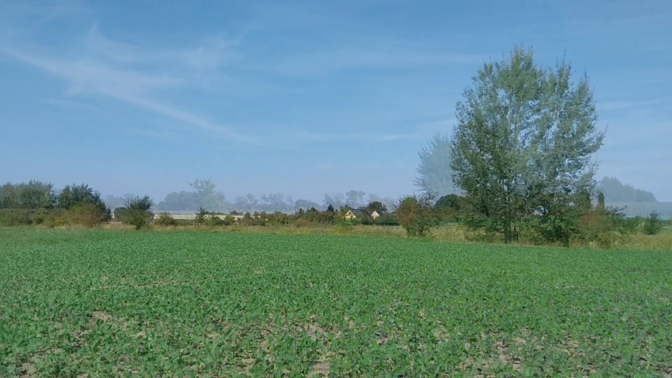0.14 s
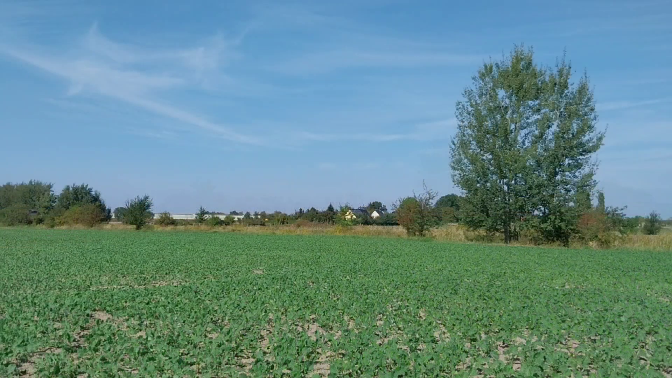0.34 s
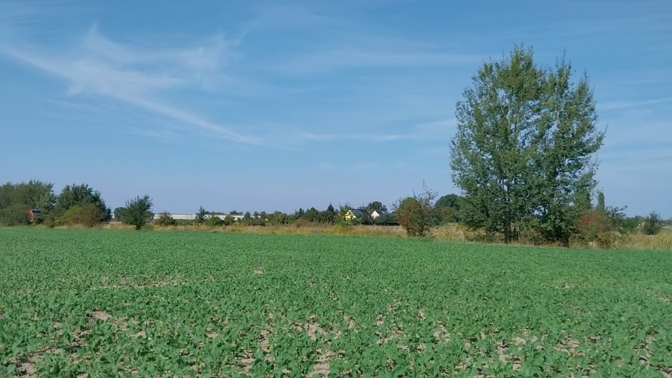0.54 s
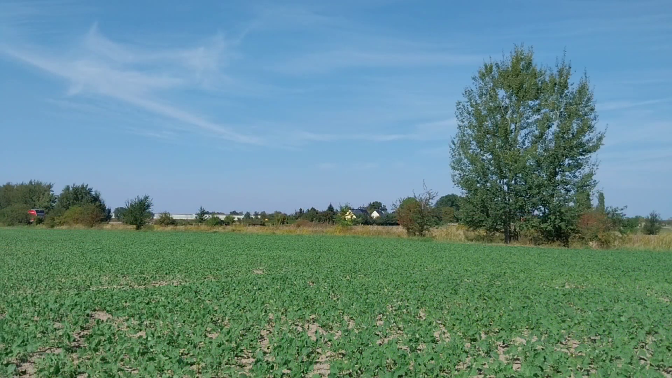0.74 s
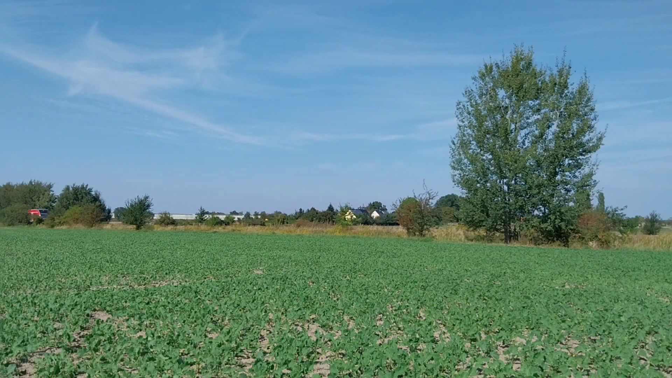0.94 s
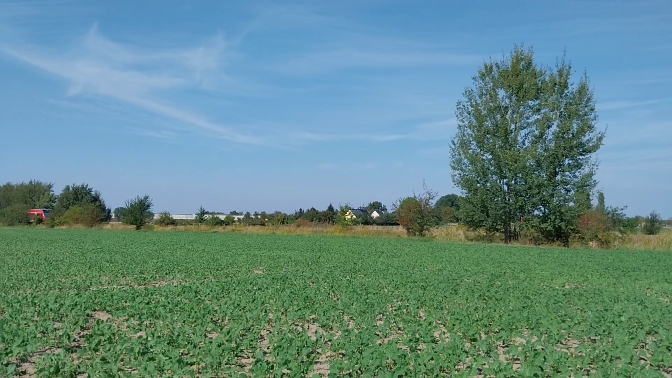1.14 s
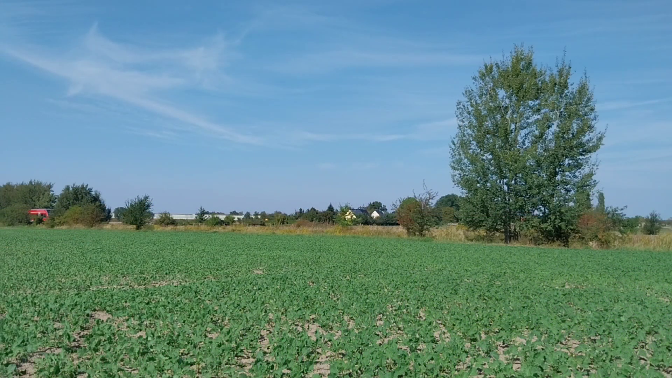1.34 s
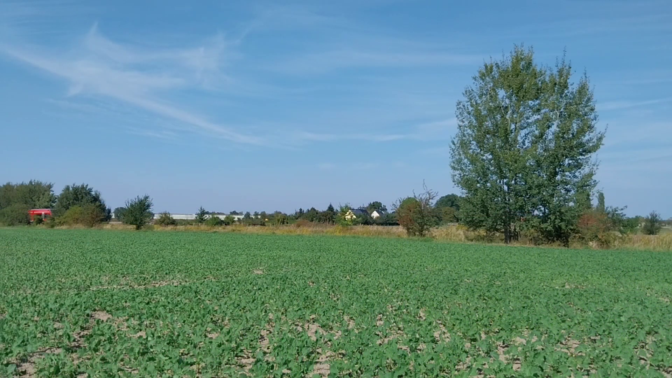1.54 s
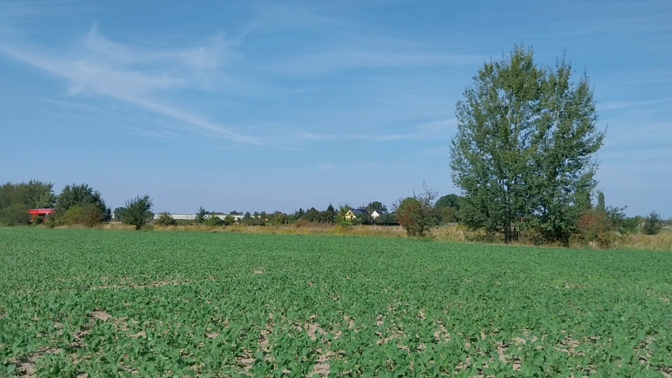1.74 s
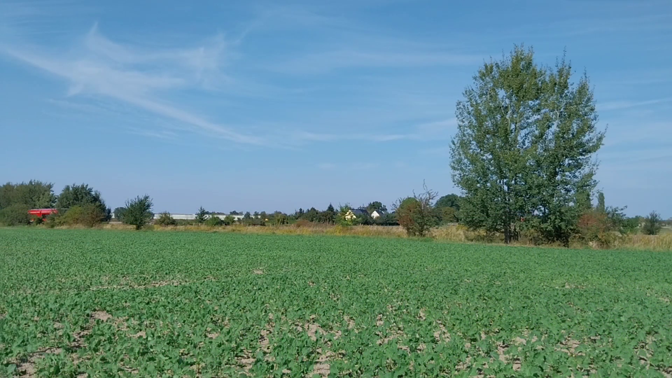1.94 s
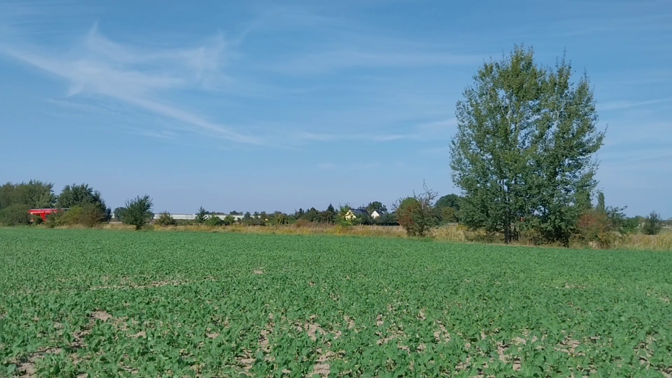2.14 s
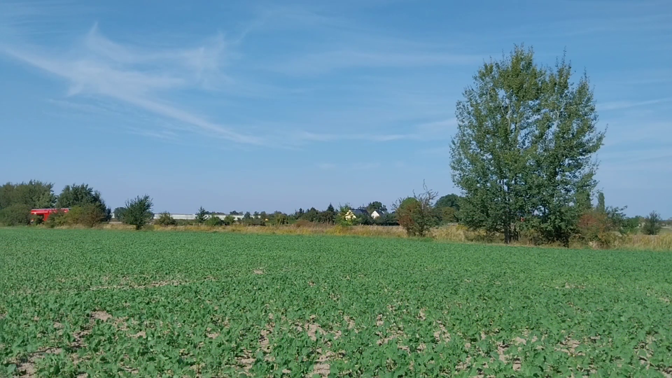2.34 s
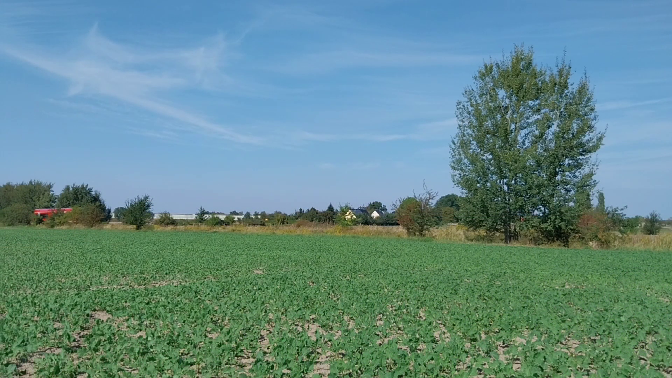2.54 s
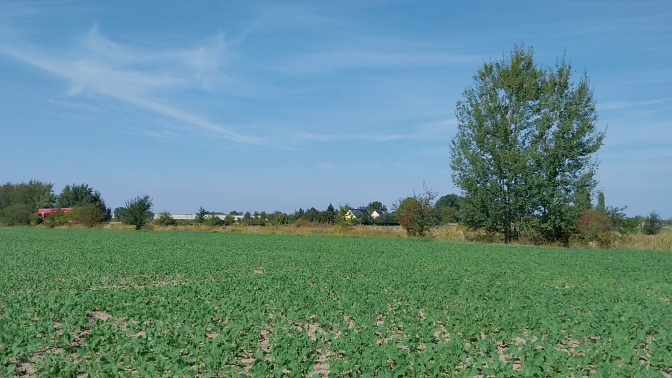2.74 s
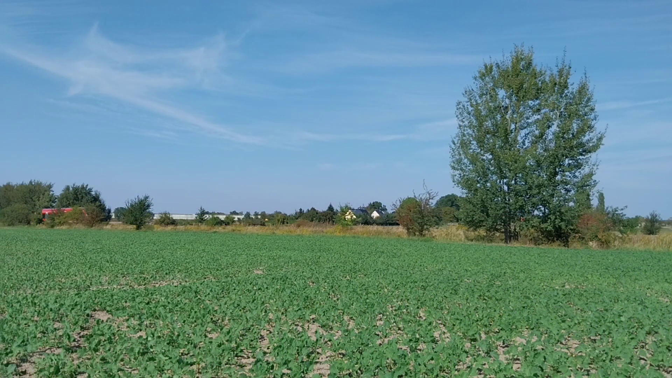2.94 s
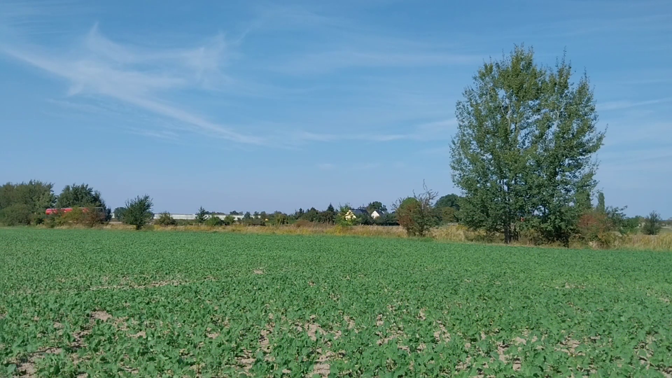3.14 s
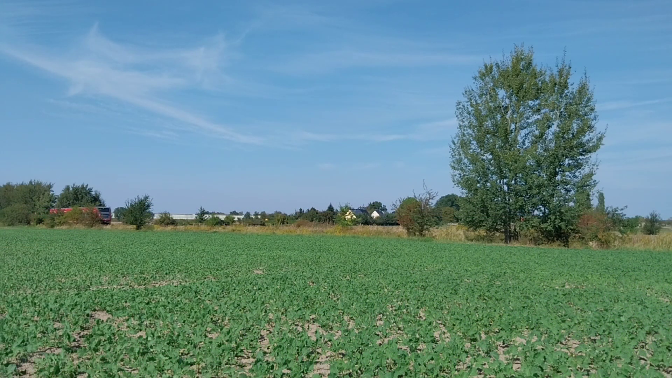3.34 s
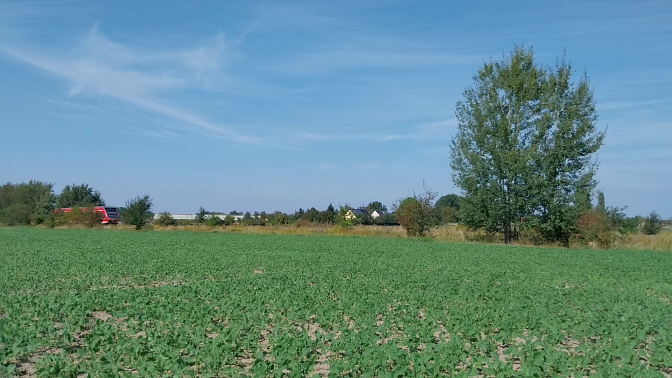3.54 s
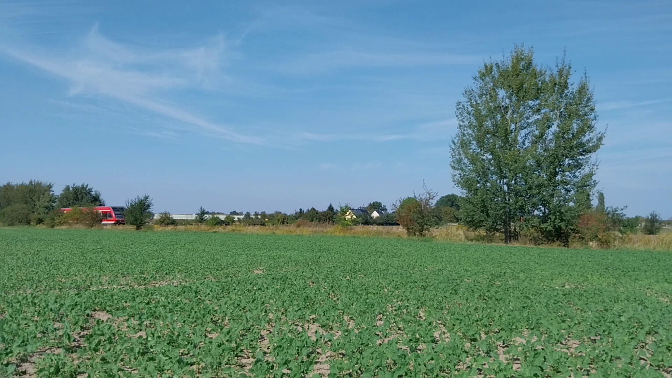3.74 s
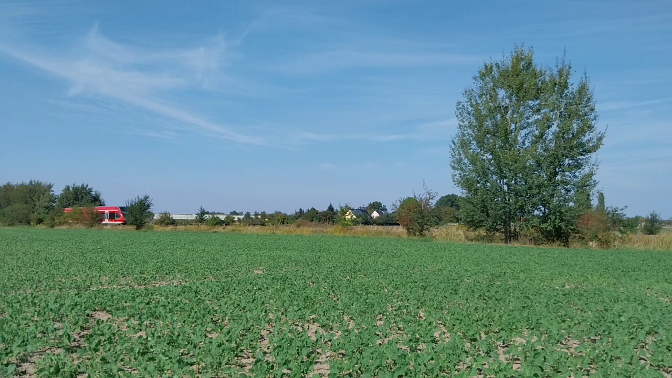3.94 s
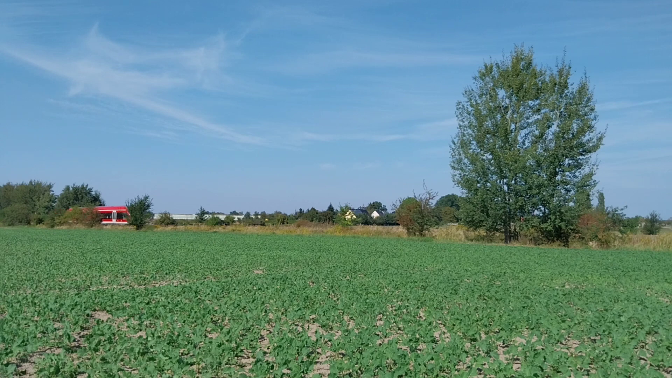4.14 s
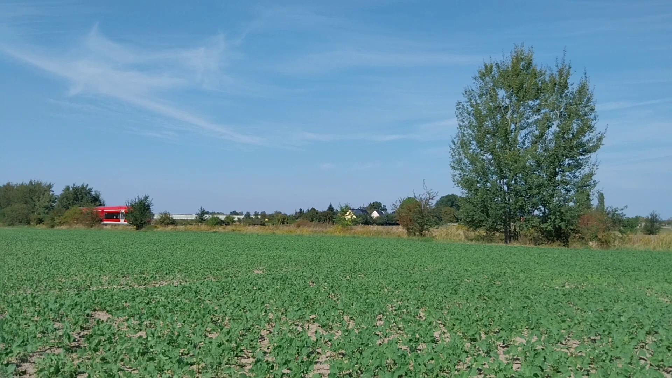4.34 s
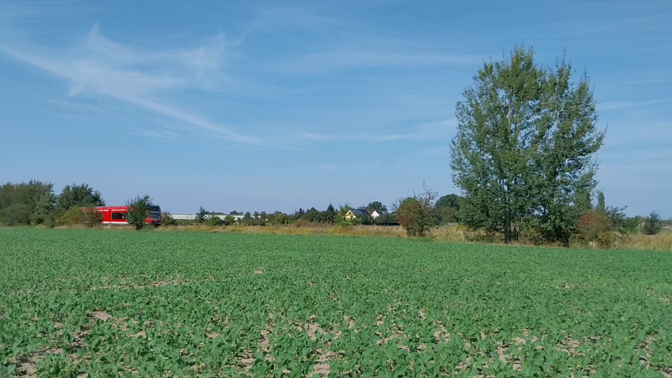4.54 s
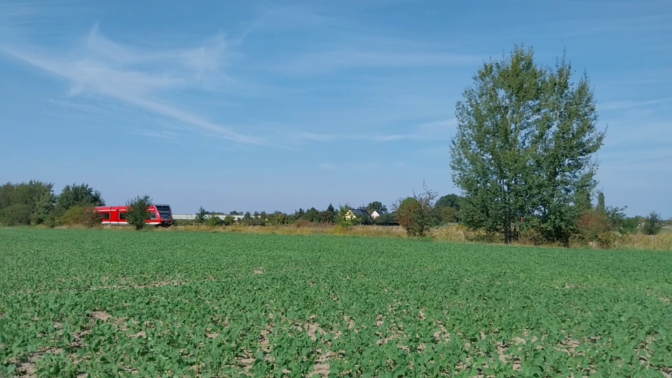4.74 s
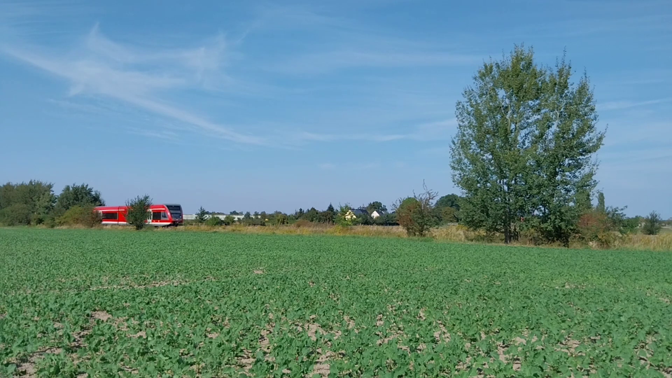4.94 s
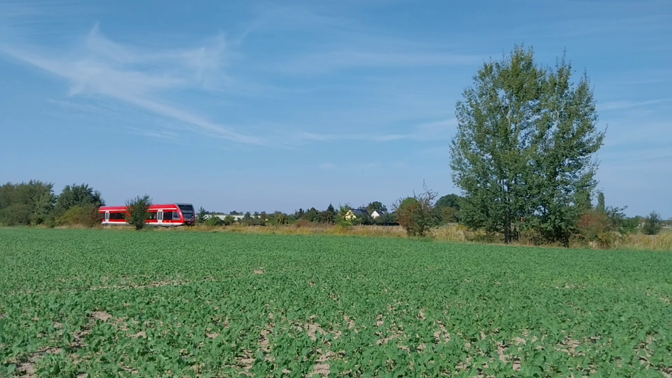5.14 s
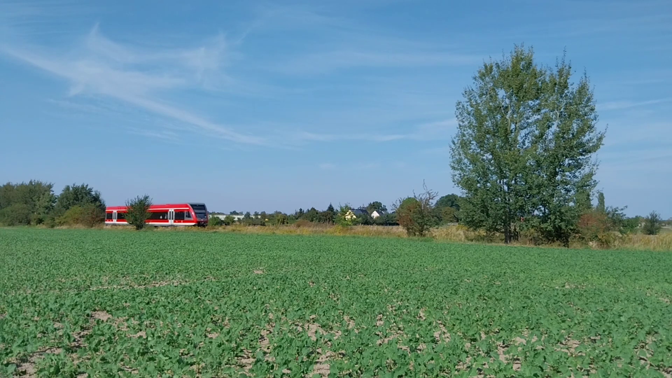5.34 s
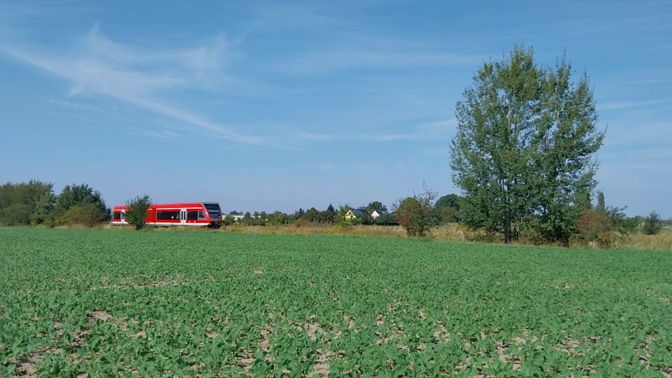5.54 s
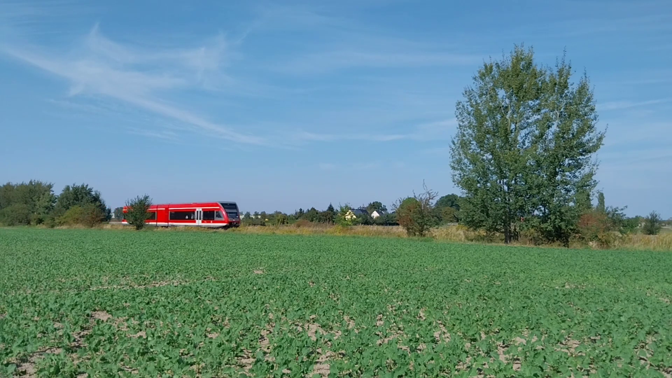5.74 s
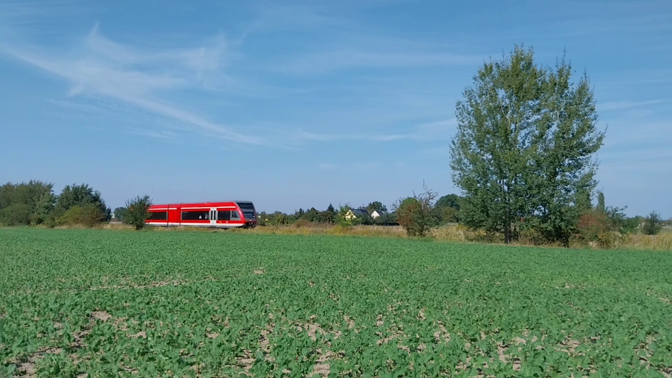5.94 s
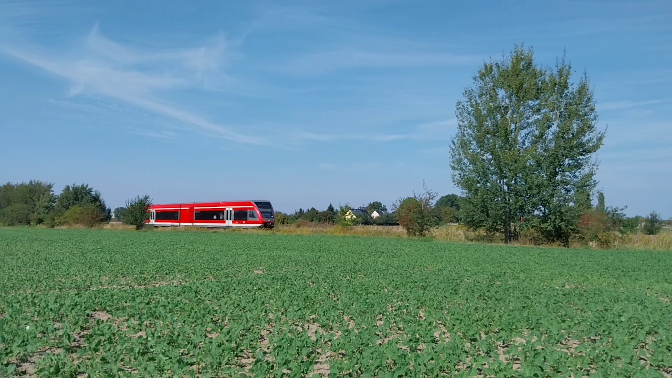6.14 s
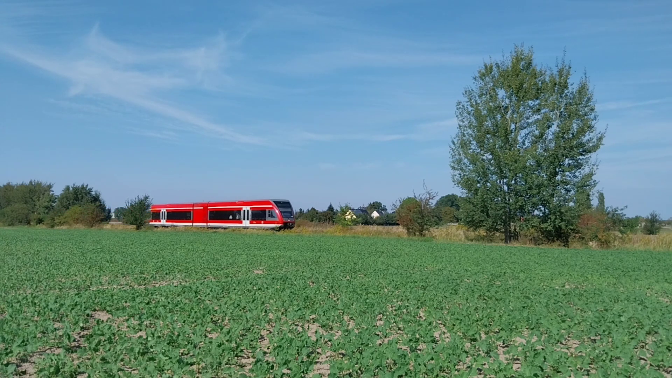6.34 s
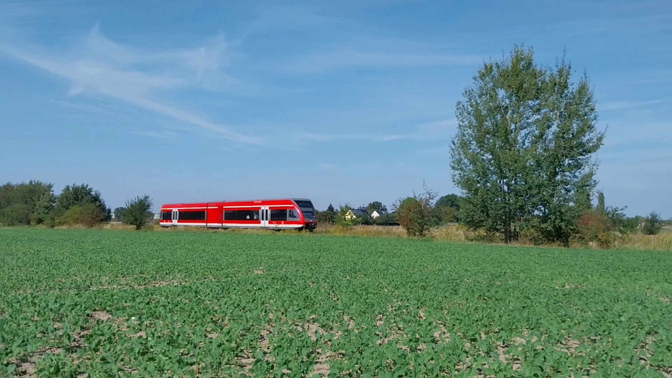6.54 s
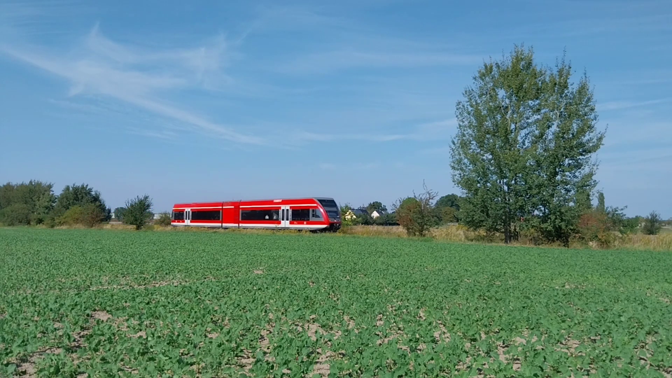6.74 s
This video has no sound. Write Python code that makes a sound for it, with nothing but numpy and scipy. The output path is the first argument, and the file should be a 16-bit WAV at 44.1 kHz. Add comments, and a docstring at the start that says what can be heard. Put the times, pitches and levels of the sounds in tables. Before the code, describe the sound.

A soft rustle fades away within the first half second over very faint hiss. A diesel railcar approaches across open countryside, its smooth low drone swelling with rumble and wheel roar. Near five seconds the engine eases off and its pitch slides down while the rolling noise keeps growing. From about 5.6 seconds a reflex camera just right of the stereo microphone fires a fast burst of crisp mechanical clacks until the end.

```python
"""A soft rustle is faded out over the first 0.6 s, over faint microphone hiss: both are shaped noise.
Meanwhile a diesel railcar nears across open fields: shaped noise for rumble, wheel roar and rail hiss, which grow,
and sines locked to the crankshaft for its engine, which drones, then slows as the driver eases off.
Near the end a reflex camera just right of the microphone fires a burst: damped modes and noise per stroke."""
import sys
import numpy as np
from scipy import signal
from scipy.fft import rfft, irfft
from scipy.io import wavfile
from scipy.ndimage import uniform_filter1d

SR = 44100
rng = np.random.default_rng(int(sys.argv[2]) if len(sys.argv) > 2 else 0)


def dump(signal):
    """Clip the signal to [-1, 1] and save it as 16-bit WAV at the path in sys.argv[1]."""
    limited = np.clip(np.atleast_2d(signal).T, -1, 1)
    pcm = np.round(limited * 32767).astype(np.int16)
    wavfile.write(sys.argv[1], SR, pcm)


N = 298998
TIME = np.arange(N) / SR
FRAME_S = np.arange(N // 512 + 6) * 512 / SR
BIN_HZ = np.fft.rfftfreq(2048, 1 / SR)


def gain_of(db):
    """Decibels to gain."""
    return 10 ** (np.asarray(db) / 20)


def evened(x):
    """Scales to rms 1."""
    return x / np.sqrt(np.mean(x ** 2) + 1e-20)


def read(points, hz):
    """Interpolates a table of (Hz, value) over log frequency."""
    table_hz, value = np.transpose(points)
    return np.interp(np.log(hz + 1), np.log(table_hz), value)


def curve(rows, t):
    """Interpolates a table of (s, value) at the times t."""
    return np.interp(t, *np.transpose(rows))


def ramp(t, start_s, length_s):
    """Rises from 0 to 1 over length_s, then holds."""
    return np.clip((t - start_s) / length_s, 0, 1)


def add(mix, start_s, sound):
    """Mixes a stereo sound in at start_s, cut at the end of the mix."""
    part = mix[:, round(start_s * SR):][:, :sound.shape[1]]
    part += sound[:, :part.shape[1]]


def wander(limit_hz):
    """Slow noise of about rms 1, reaching up to about limit_hz."""
    size = 2 ** 19
    hz = np.fft.rfftfreq(size, 1 / SR)
    spectrum = rfft(rng.standard_normal(size)) / (1 + (hz / limit_hz) ** 4)
    return evened(irfft(spectrum)[:N])


# straight track; the nearest point comes after the end of the scene
SPEED_M_PER_S, TRACK_M, NEAREST_S = 21.2, 70.0, 7.63
PORT_LEAD_MS = .26  # lead of the left microphone for a sound from the far left


def train_place(t):
    """The train's distance (m) and the lead of the left microphone (s) that its bearing gives."""
    to_go_m = SPEED_M_PER_S * (NEAREST_S - t)
    distance_m = np.hypot(to_go_m, TRACK_M)
    return distance_m, PORT_LEAD_MS / 1000 * to_go_m / distance_m


def approach(nearest_db, loss_db):
    """Gain of a sound that loses loss_db with each doubling of the train's distance."""
    return gain_of(nearest_db - loss_db * np.log2(train_place(TIME)[0] / TRACK_M))


# Level difference of the microphones. Each row: frequency in Hz, left minus right in dB.
MIC_BALANCE = [(55, -1.3), (68, -3), (76, -5.4), (83, -5.4), (90, -1.1), (170, -.7), (230, -2.6), (320, 1),
               (420, -1), (560, -5.5), (850, -1.2), (4400, -.5), (15000, -1)]
# Phase difference of the microphones. Each row: frequency in Hz, lead of the left in radians.
MIC_PHASE = [(78, -0.18), (88, 0.36), (115, 0.45), (200, -0.04), (280, 0.33), (430, -0.34), (570, 0.41),
             (1200, 0.037)]


def air_noise(field_db, patchy_db, likeness):
    """Stereo noise from the train's side with a given spectrum, mottled by moving air; rms 1."""
    a, b, c, d, patches = rng.standard_normal((5, len(FRAME_S), len(BIN_HZ)))
    patches = uniform_filter1d(patches, size=12, axis=0)
    patches = evened(uniform_filter1d(patches, size=14, axis=1))
    lead_s = train_place(FRAME_S)[1][:, None]
    delay = np.exp(-2j * np.pi * BIN_HZ * lead_s - 1j * read(MIC_PHASE, BIN_HZ))
    left = a + 1j * b
    right = delay * (likeness * left + np.sqrt(1 - likeness ** 2) * (c + 1j * d))
    lean = gain_of(read(MIC_BALANCE, BIN_HZ) / 2)
    field = np.array([left * lean, right / lean]) * gain_of(field_db + patchy_db * patches)
    noise = signal.istft(field.transpose(0, 2, 1), nperseg=2048, noverlap=1536)[1]
    return evened(noise[:, :N])


# Likeness of the two channels for the train and the microphone hiss. Each row: frequency in Hz, likeness 0-1.
CHANNEL_LIKENESS = [(30, .7), (48, .98), (400, .97), (600, .85), (1500, .85), (3000, .8), (6000, .75),
                    (12000, .3)]
# Relative spectrum of the rustle. Each row: frequency in Hz, level in dB per Hz.
RUSTLE_SPECTRUM = [(60, -12.5), (235, 14), (310, 0), (440, 4.5), (520, 1.5), (950, -1), (1100, -8),
                   (1230, 4), (1420, -10), (1690, 1.5), (1900, -1), (2100, 2), (2900, -10), (3600, -8.5),
                   (5500, -20), (7800, -33), (9600, -29), (12000, -44)]
# Relative spectrum of the microphones' own noise. Each row: frequency in Hz, level in dB per Hz.
MIC_SPECTRUM = [(20, 23.5), (34, 32), (46, 33.5), (65, 19.5), (200, 4.5), (4000, 0), (8000, -3),
                (11000, 5.5), (14000, 6), (15500, 4), (16200, -22.5)]
RUSTLE_START_DB, FADE_OUT_S, FADE_OUT_POWER = -46.5, 0.6, 1.32


def background(hiss_db=-77):
    """Shaped noise: a rustle that is faded out, and the microphones' own faint hiss and rumble."""
    fade_out = np.clip(1 - TIME / FADE_OUT_S, 0, 1) ** FADE_OUT_POWER
    rustle = air_noise(read(RUSTLE_SPECTRUM, BIN_HZ), patchy_db=.5, likeness=0.12)
    likeness = read(CHANNEL_LIKENESS, BIN_HZ)
    hiss = air_noise(read(MIC_SPECTRUM, BIN_HZ), patchy_db=1.5, likeness=likeness)
    return gain_of(RUSTLE_START_DB) * fade_out * rustle + gain_of(hiss_db) * hiss


def dense_ring(spectrum, size=8192):
    """The many close modes of a small mechanism as undamped noise; the channels differ more in the treble."""
    hz = np.fft.rfftfreq(size, 1 / SR)
    a, b = rfft(rng.standard_normal((2, size)))
    same = read([(1000, 1.0), (5000, 0.48), (9000, 0.046)], hz)
    pair = np.array([a, same * a + np.sqrt(1 - same ** 2) * b])
    return evened(irfft(pair * gain_of(read(spectrum, hz))))


FIRST_RELEASE_S, PICTURE_GAP_S, PICTURE_COUNT = 5.642, .1885, 7  # the end cuts the last picture off


def camera_part(strokes, spectrum, modes, rise_s, body_db, body_t60_s, alike=0.68):
    """A part hits its stops in every picture, never quite the same way; the camera body rings on."""
    out = np.zeros((2, N))
    for after_s, db, t60_s in strokes:
        own = dense_ring(spectrum)
        t = np.arange(own.shape[1]) / SR
        decay = np.hypot(gain_of(-60 * t / t60_s), gain_of(body_db - 60 * t / body_t60_s))
        ring = sum(gain_of(mode_db - 60 * t / mode_t60_s) * np.sin(2 * np.pi * hz * t)
                   for hz, mode_db, mode_t60_s in modes)
        for picture, force in enumerate(rng.standard_normal(PICTURE_COUNT)):
            # chance builds up along the chain of levers: late strokes vary most in force
            blow = gain_of(db + force * (.3 + 12 * after_s)) * (1 - np.exp(-t / rise_s))
            clatter = np.sqrt(alike) * own + np.sqrt(1 - alike) * dense_ring(spectrum)
            start_s = FIRST_RELEASE_S + picture * PICTURE_GAP_S + after_s
            add(out, start_s, blow * (ring + decay * clatter))
    return out


# Strokes within one picture, by part. Each row: time after the release in s, mean level in dB, t60 in s.
LATCH_STROKES = [(0, -28, 0.014)]
MIRROR_STROKES = [(.0120, -20.5, 0.017), (.0175, -33.5, 0.029)]
CURTAIN_STROKES = [(.0500, -50, .03), (.0554, -22.5, 0.02), (.0620, -29.5, .028)]
RETURN_STROKES = [(.0798, -33.5, 0.057), (.0897, -24.5, 0.0077), (.0960, -41.5, .028), (.1090, -43, 0.05)]
# Relative spectrum of each part's dense clatter. Each row: frequency in Hz, level in dB per Hz.
LATCH_CLATTER = [(200, -20), (700, -5), (1400, -7), (2700, 5.5), (3700, 6), (5300, 7.5), (6800, -3.5),
                 (9000, -1.5), (13500, -5), (15500, -7)]
MIRROR_CLATTER = [(200, -35), (500, -7), (800, -4), (1050, 2), (1800, 4.5), (2200, 5), (3100, -17),
                  (3800, 7), (5700, -1), (7600, 5), (9500, -13), (11300, 3), (14600, 2.5), (16000, -19)]
CURTAIN_CLATTER = [(250, -15), (750, 3), (1100, -6), (1800, 2.5), (2400, -5.5), (3000, -2.5), (3500, -8.5),
                   (5600, 1), (6300, -4), (8000, -5), (9200, -5.5), (11200, -0.5), (14000, -3.5),
                   (16000, -13)]
RETURN_CLATTER = [(250, -16), (700, 6), (1000, 2), (1500, 8), (2300, 2.5), (3000, 3.5), (5000, 4.5),
                  (6300, 1.5), (7500, -1.5), (9300, -1.5), (11600, -1.5), (13600, 4.5), (15800, -9)]
# Strongest modes of each part. Each row: frequency in Hz, level against the stroke in dB, t60 in s.
LATCH_TONES = [(1223, -8.5, 0.043), (1760, -8, 0.042), (4000, -5, 0.023)]
MIRROR_TONES = [(672, -14.5, 0.052), (786, -8, 0.025), (1456, -5.5, 0.014), (1763, -6, 0.021),
                (4400, -15, 0.025), (5540, -1.5, 0.0096)]
CURTAIN_TONES = [(690, -9, 0.018), (2990, -7.5, 0.021), (5740, -9, 0.013), (11240, -12, .008)]
RETURN_TONES = [(1600, -18, 0.018), (2970, -18, 0.021), (5260, -9, 0.01), (11460, -2.5, 0.01)]
# The camera is off to the right. Each row: frequency in Hz, right minus left in dB.
CAMERA_SIDE = [(700, 2.5), (1200, 0), (2000, 0), (3800, 5), (6500, 0), (9000, 5), (12000, 6.5),
               (15000, 2.5)]


def camera():
    """Each picture: the latch lets go, the mirror slaps up, the curtains run, the mirror drops back."""
    snap_s, slap_s, slide_s = .00015, .0003, .0006  # build-up of each kind of contact
    out = camera_part(LATCH_STROKES, LATCH_CLATTER, LATCH_TONES, snap_s, body_db=-9.5, body_t60_s=0.12)
    out += camera_part(MIRROR_STROKES, MIRROR_CLATTER, MIRROR_TONES, snap_s, body_db=-23, body_t60_s=0.076)
    out += camera_part(CURTAIN_STROKES, CURTAIN_CLATTER, CURTAIN_TONES, slide_s, body_db=-27, body_t60_s=0.081)
    out += camera_part(RETURN_STROKES, RETURN_CLATTER, RETURN_TONES, slap_s, body_db=-13, body_t60_s=0.14)
    side_db = read(CAMERA_SIDE, np.fft.rfftfreq(N, 1 / SR)) / 2
    return irfft(rfft(out) * gain_of(np.array([-side_db, side_db])), N)


# Relative spectrum of the body rumble. Each row: frequency in Hz, level in dB per Hz.
RUMBLE_SPECTRUM = [(32, -51), (44, -23), (50, -5.5), (70, 4.5), (110, 2.5), (160, -1.5), (245, -2.5),
                   (295, -15), (375, -8.5), (470, -19.5), (580, -30.5), (900, -63.5), (2000, -100)]
# Relative spectra of the wheel roar, far and near. Each row: frequency in Hz, level in dB per Hz.
FAR_ROAR_SPECTRUM = [(200, -31.5), (480, -1), (700, -7.5), (1030, -7.5), (1270, -0.5), (1700, -4),
                     (2000, -5), (2700, -6), (3200, -14.5), (5000, -36.5), (9000, -69)]
NEAR_ROAR_SPECTRUM = [(200, -27.5), (560, -6.5), (700, -2), (1020, -5), (1220, -2), (1430, -5), (1650, -5),
                      (2050, -7.5), (2600, -7.5), (3200, -13.5), (5000, -22.5), (9000, -35.5),
                      (16000, -60.5)]
# Relative spectrum of the rail hiss. Each row: frequency in Hz, level in dB per Hz.
RAIL_SPECTRUM = [(1500, -38.5), (3200, -6.5), (3900, 2.5), (5000, -3), (5800, -7), (6600, -14),
                 (8000, -23.5), (11000, -30.5), (16000, -41)]
# Resonances that stand out of the wheel roar. Each row: centre in Hz, width in Hz, boost in dB.
WHEEL_RESONANCES = [(498, 61, 8), (662, 42, 7), (814, 30, 5), (1150, 76, 1.5), (1285, 20, 7),
                    (1584, 150, 4.5), (2410, 82, 5.5)]
# The train comes out from behind bushes, the rail hiss opens up. Each row: start in s, length in s, gain in dB.
HISS_CLEARINGS = [(1.1, .5, 5), (1.614, .05, 6), (3.13, .08, 2.0), (5.594, 0.5, 8)]
# the wheel roar fills out as the train comes into the open
OPEN_START_S, OPEN_LENGTH_S, OPEN_GAIN_DB = 3.07, .9, 2
# level at the nearest point, before the opening gains, and loss per doubling of distance
RUMBLE_DB, RUMBLE_LOSS_DB = -32.5, 10.5
ROAR_DB, ROAR_LOSS_DB = -45, 15
RAILS_DB, RAILS_LOSS_DB = -75, 5


def running():
    """Shaped noise: body rumble, wheel roar that fills out as the train nears, and the hiss of the rails."""
    likeness = read(CHANNEL_LIKENESS, BIN_HZ)
    near = ramp(FRAME_S[:, None], OPEN_START_S, OPEN_LENGTH_S)
    roar_db = (1 - near) * read(FAR_ROAR_SPECTRUM, BIN_HZ) + near * read(NEAR_ROAR_SPECTRUM, BIN_HZ)
    roar_db += sum(db / (1 + (2 * (BIN_HZ - hz) / width_hz) ** 2) for hz, width_hz, db in WHEEL_RESONANCES)
    open_db = OPEN_GAIN_DB * ramp(TIME, OPEN_START_S, OPEN_LENGTH_S)
    clear_db = sum(db * ramp(TIME, start_s, length_s) for start_s, length_s, db in HISS_CLEARINGS)
    rumble = air_noise(read(RUMBLE_SPECTRUM, BIN_HZ), patchy_db=-0.24, likeness=likeness)
    roar = air_noise(roar_db, patchy_db=1.25, likeness=likeness)
    hiss = air_noise(read(RAIL_SPECTRUM, BIN_HZ), patchy_db=1.7, likeness=likeness)
    out = rumble * approach(RUMBLE_DB, RUMBLE_LOSS_DB)
    out += roar * approach(ROAR_DB + open_db, ROAR_LOSS_DB)
    out += hiss * approach(RAILS_DB + clear_db, RAILS_LOSS_DB)
    return out


def engine_tone(shaft_hz, multiple, level_db, flutter_db, waver_rad):
    """One multiple of the crankshaft rate; the air on the way makes its level and phase waver."""
    hz = multiple * shaft_hz
    phase = 2 * np.pi * (np.cumsum(hz) / SR + rng.random()) + waver_rad * wander(5.5)
    lag = 2 * np.pi * hz * train_place(TIME)[1] + read(MIC_PHASE, hz)
    lean = gain_of(read(MIC_BALANCE, hz) / 2)
    pair = np.array([np.sin(phase) * lean, np.sin(phase - lag) / lean])
    return np.sqrt(2) * gain_of(level_db + flutter_db * wander(7)) * pair


# Engine speed before smoothing. Each row: time in s, firing rate in Hz.
FIRING_RATE = [(0.5, 94.31), (4.49, 94.8), (5.01, 91.08), (5.51, 85.28), (5.99, 81.16), (6.7, 76.35)]
# Base level of the engine tones. Each row: time in s, level in dB.
DRONE_LEVEL = [(0, -46.5), (.5, -41.5), (1.12, -36.5), (1.7, -38.5), (1.9, -35), (4.5, -27.5), (5.0, -29),
               (6.38, -29.5), (6.65, -27.5)]
# Weaker tones. Each row: multiple of the crankshaft rate, dB against the base under power, dB when eased off.
WEAK_TONES = [(1.5, -25, -39), (2, -23.5, -44), (4, -29, -20.5), (4.5, -30.5, -29.5), (5.5, -26, -26),
              (9.5, -40.5, -19), (10.5, -31, -27), (12, -27.5, -28.5), (13, -30, -20.5), (14, -32, -26.5),
              (14.5, -43.5, -23), (15, -38.5, -24.5)]
# Exhaust peaks and dips the hum slides through as the engine slows. Each row: centre in Hz, width in Hz, gain in dB.
EXHAUST_RESONANCES = [(188.8, 15, 12.5), (206.7, 11, -9.5), (181, 7.86, -7.5)]
FIRINGS_PER_TURN = 3
HUM_ORDER, HUM_DB = 7, -12.5  # multiple of the crankshaft rate; level against the base, before the resonances
EASE_START_S, EASE_LENGTH_S = 4.82, 1.0  # the tone changes as the driver eases off


def engine(firing_db=0.67):
    """A clean firing tone, the exhaust hum and fainter multiples, all locked to the crankshaft."""
    # the flywheel rounds every change
    shaft_hz = uniform_filter1d(curve(FIRING_RATE, TIME), size=12000) / FIRINGS_PER_TURN
    level_db = curve(DRONE_LEVEL, TIME)
    eased = ramp(TIME, EASE_START_S, EASE_LENGTH_S)
    hum_hz = HUM_ORDER * shaft_hz
    boom_db = sum(db * np.exp(-(2 * (hum_hz - hz) / width_hz) ** 2) for hz, width_hz, db in EXHAUST_RESONANCES)
    out = engine_tone(shaft_hz, FIRINGS_PER_TURN, level_db + firing_db, flutter_db=0.3, waver_rad=.02)
    out += engine_tone(shaft_hz, HUM_ORDER, level_db + HUM_DB + boom_db, flutter_db=0.7, waver_rad=0.069)
    for multiple, power_db, eased_db in WEAK_TONES:
        tone_db = level_db + (1 - eased) * power_db + eased * eased_db
        half_step = round(2 * multiple) / 2  # four-stroke: half steps
        out += engine_tone(shaft_hz, half_step, tone_db, flutter_db=2, waver_rad=0.43)
    return out


def scene():
    """The train far out in the open, the camera close by."""
    return background() + camera() + running() + engine()


def record(dry, edge_hz=16100):
    """The recorder's band limit: a low-pass at edge_hz."""
    low_pass = signal.firwin(255, edge_hz, window=("kaiser", 8), fs=SR)
    return signal.oaconvolve(dry, low_pass[None], "same")


dry = scene()
out = record(dry)
dump(out)
```